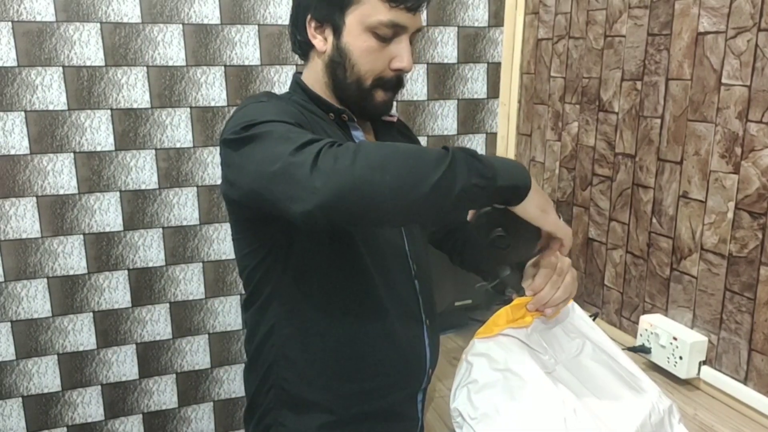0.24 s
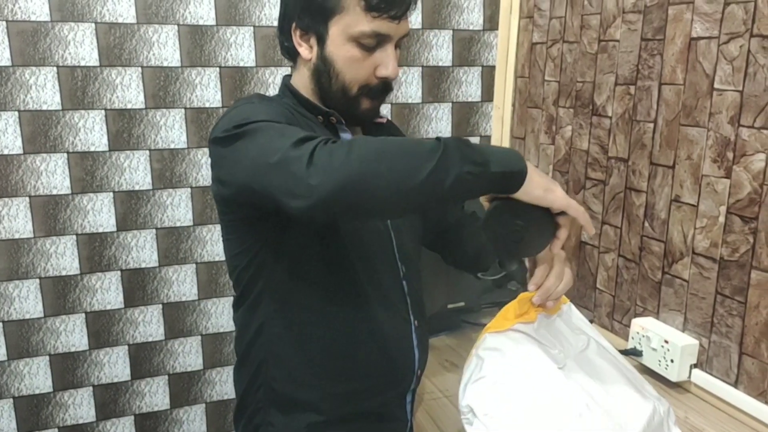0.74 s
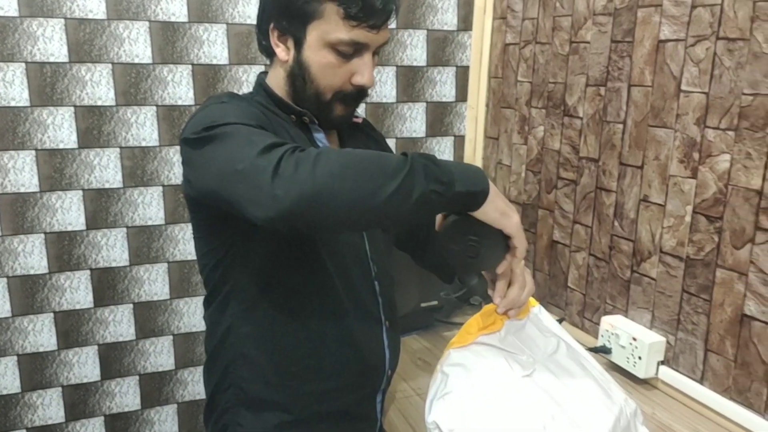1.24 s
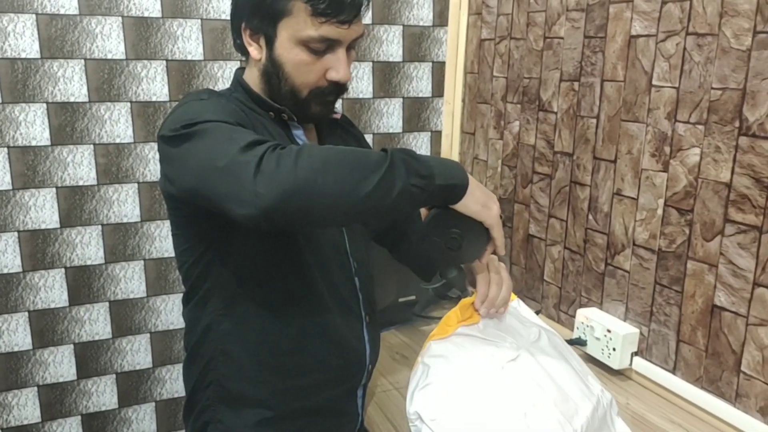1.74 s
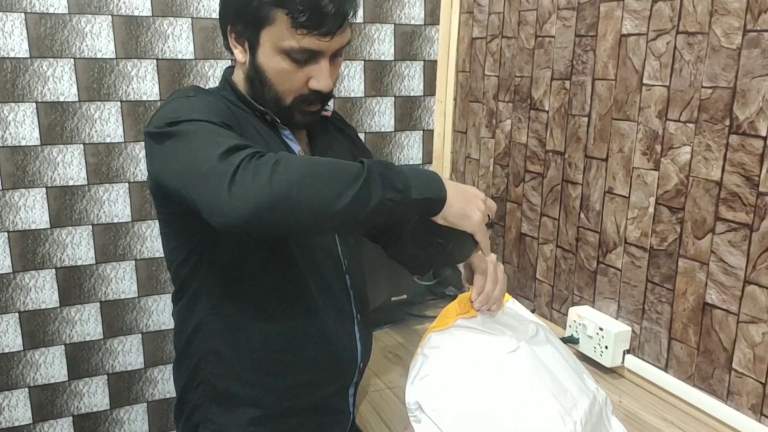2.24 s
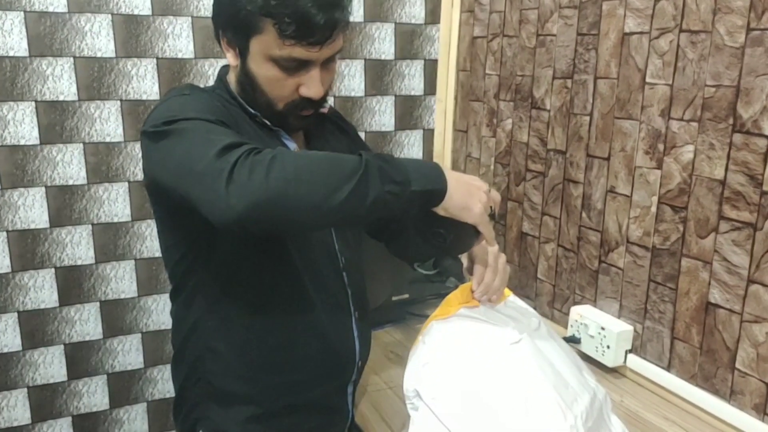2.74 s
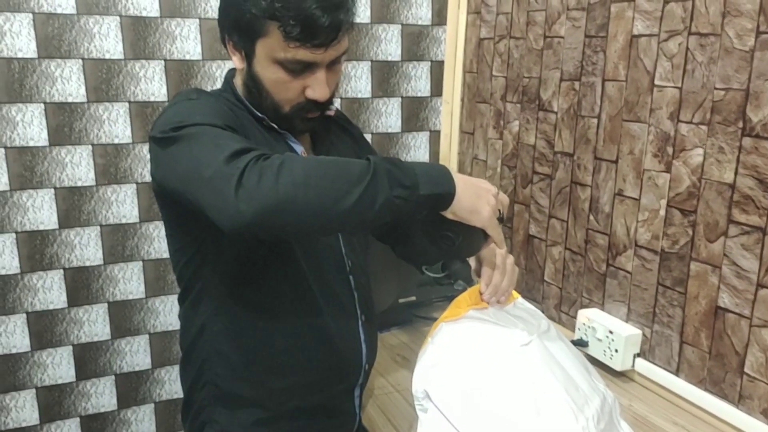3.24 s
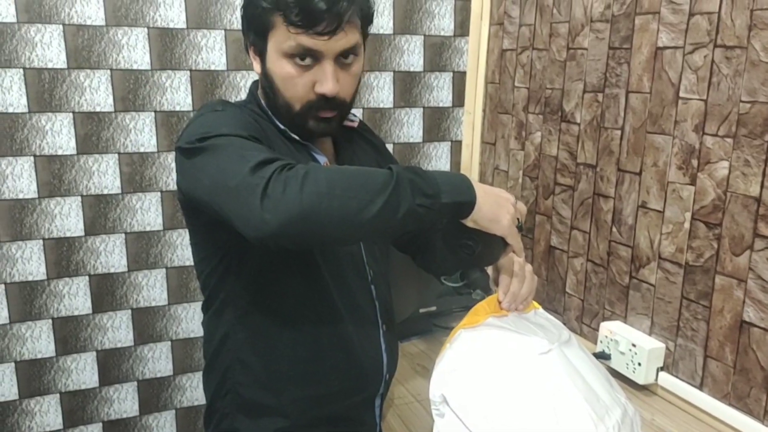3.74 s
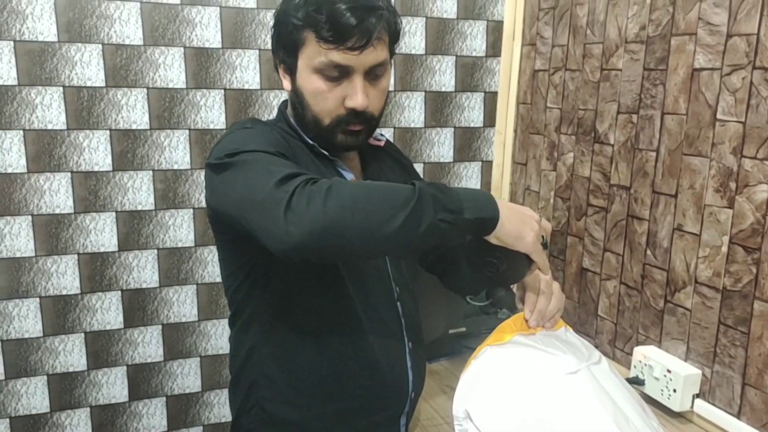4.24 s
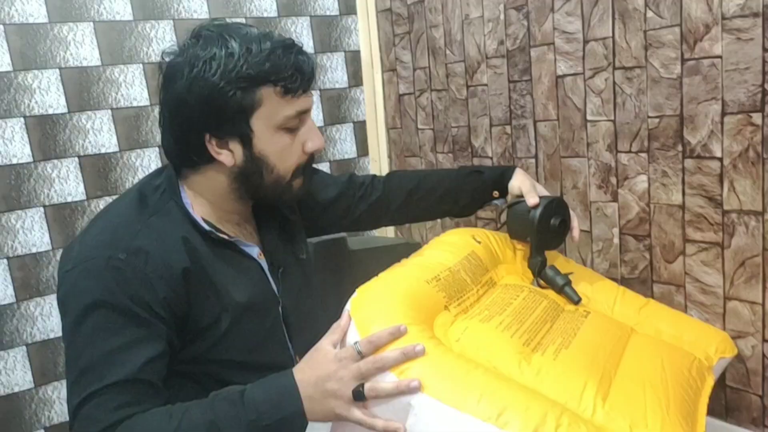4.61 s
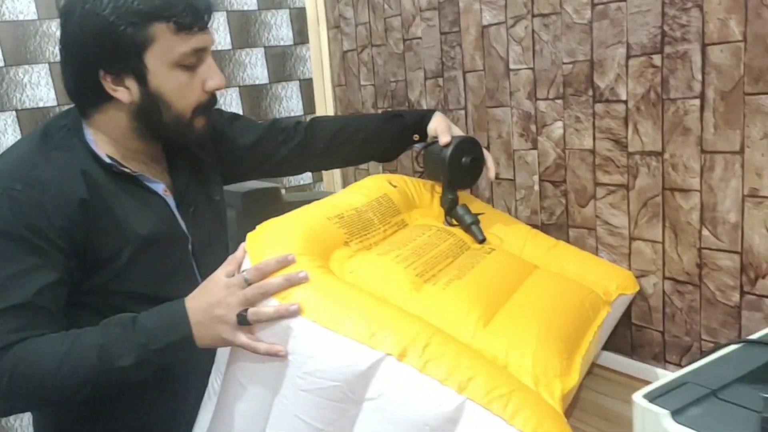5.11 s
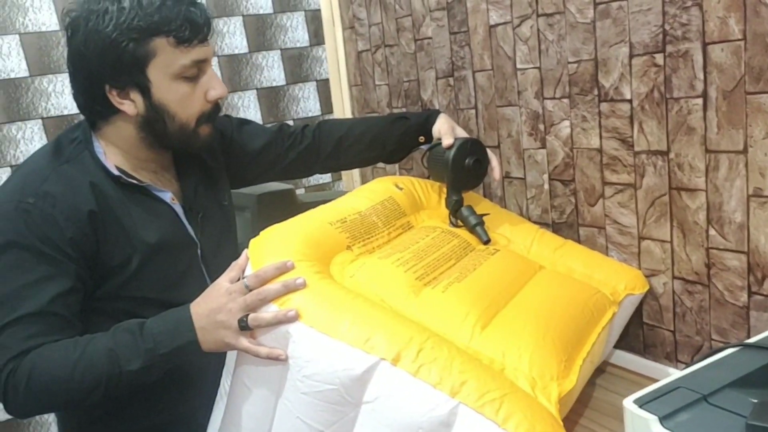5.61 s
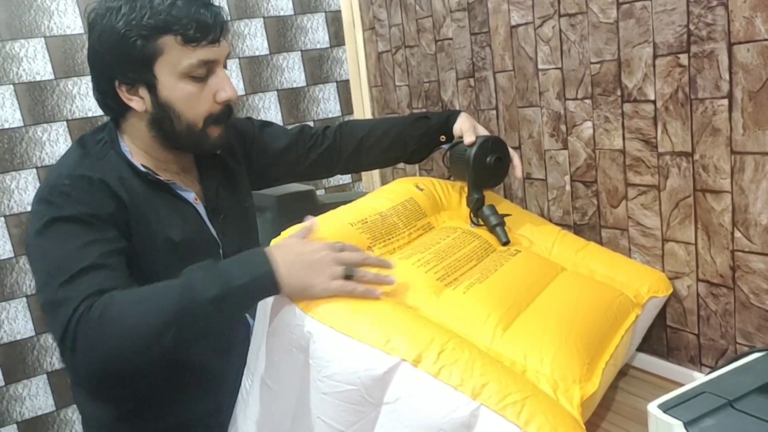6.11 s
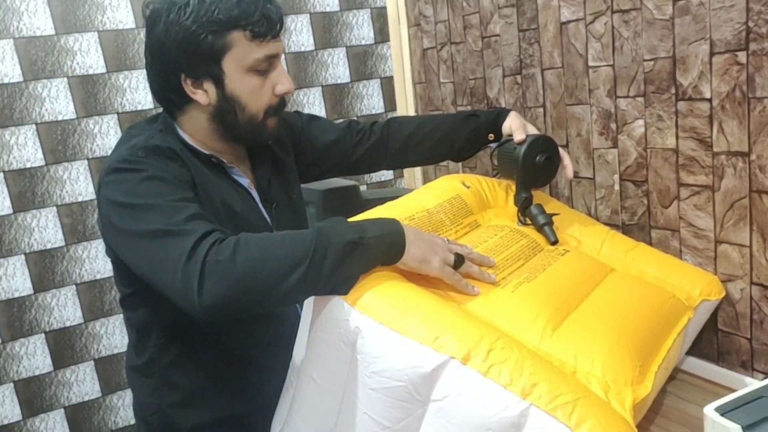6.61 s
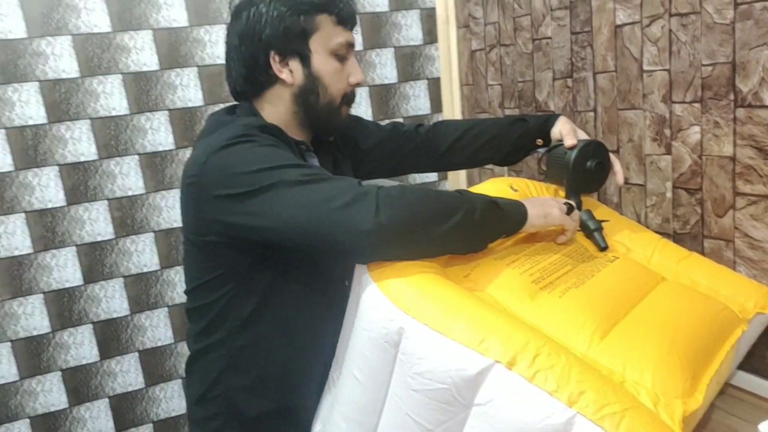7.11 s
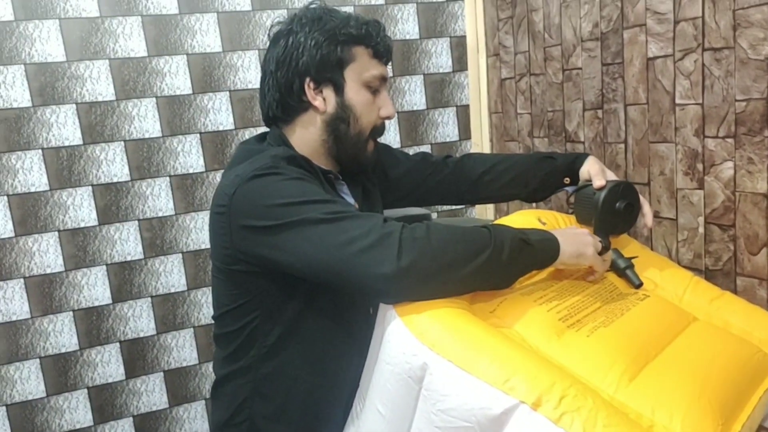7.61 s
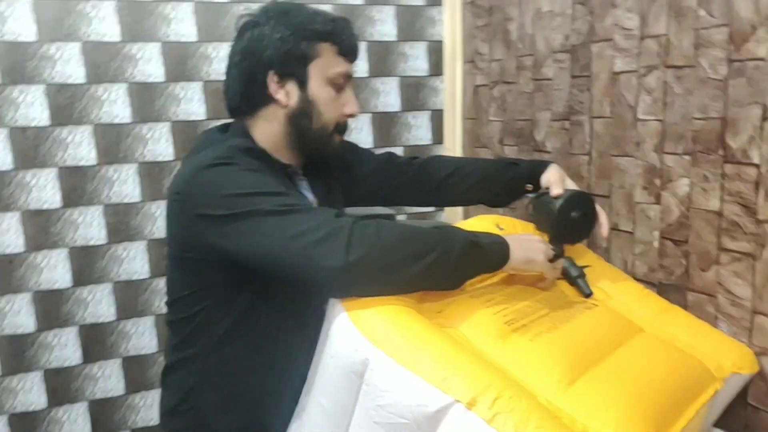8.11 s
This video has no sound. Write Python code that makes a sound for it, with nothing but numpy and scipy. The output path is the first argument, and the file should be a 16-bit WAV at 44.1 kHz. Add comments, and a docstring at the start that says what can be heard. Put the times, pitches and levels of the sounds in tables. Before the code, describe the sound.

Switch clicks, then a small electric air pump whines up, sags for half a second, revs again, cuts out, and resumes steadily before thinning to gurgle.

```python
"""Faint room noise and a few switch clicks come first, then a small electric air pump starts to whine.
It is blowing up a vinyl chair: it starts, coasts for half a second and revs up again, then a silent cut.
In the second part it runs steadily, until a noise suppressor leaves a gurgle and the whine.
Filtered noise makes the rush of air; sine tones tied to the turning shaft make the whine."""
import sys
import numpy as np
from scipy import signal
from scipy.fft import rfft, irfft, next_fast_len
from scipy.io import wavfile
from scipy.ndimage import uniform_filter1d, minimum_filter1d, map_coordinates

SR = 44100
rng = np.random.default_rng(int(sys.argv[2]) if len(sys.argv) > 2 else 0)


def dump_mix(stems):
    """Bounce the given channels to the path in sys.argv[1] as a 16-bit WAV at rate SR."""
    frames = np.atleast_2d(stems).T  # one column per channel
    limited = np.clip(frames, -1, 1)  # hard clip at full scale
    pcm = np.round(limited * 32767).astype(np.int16)
    wavfile.write(sys.argv[1], SR, pcm)


N = 368676
TIME = np.arange(N) / SR

# background noise of the room: pitch_hz, relative_db (per Hz)
ROOM_COLOUR = [(24, -61.5), (40, -38), (67, -31), (111, -2), (177, -28.5), (514, 3.5), (728, -11),
               (8480, -22.5), (15000, -34)]
# low hum near 100 Hz: pitch_hz, relative_db (per Hz)
HUM_COLOUR = [(25, -31.5), (60, -19.5), (100, -7.5), (125, -6), (160, -15), (300, -35)]
# colour of a plastic click: pitch_hz, relative_db (per Hz)
CLICK_COLOUR = [(59, -50), (100, -27), (1160, -13), (1290, -19), (1530, -9), (1840, -19.5), (3390, -27),
                (4540, -32), (15000, -25)]
# switch being pressed, snapping shut and settling: start_s, level_db, decay_s
SWITCH_CLICKS = [(0.1, -44, 0.0069), (.121, -50, 0.0093), (.14, -36.5, 0.012), (.158, -41, .006),
                 (.177, -40, .004)]
# hiss of a palm on the vinyl, its peaks: centre_hz, width_hz, lift_db
SLIDE_PEAKS = [(8150, 250, 9), (8770, 380, 14)]
# the slope under those peaks: pitch_hz, relative_db (per Hz)
SLIDE_SLOPE = [(6000, -6), (8500, 0), (12000, -8)]
# the open nozzle's resonance, which the pinch damps: centre_hz, width_hz, lift_db
NOZZLE_PEAKS = [(4320, 640, 22)]
# air leaking past the fingers that pinch the valve: centre_hz, width_hz, lift_db
LEAK_PEAKS = [(3890, 520, 26.5), (6550, 650, 23.5), (9100, 250, 21), (9750, 600, 19)]
# the slope under nozzle and leak: pitch_hz, relative_db (per Hz)
LEAK_SLOPE = [(1500, -15), (3000, 2), (11000, 2.0), (15000, -5)]
# scraping and sparking of the motor brushes: pitch_hz, relative_db (per Hz)
SPARK_COLOUR = [(500, -14.5), (1000, 3.5), (1400, 9), (2100, -12.5), (4000, -14.5), (5800, -20.5),
                (6800, -10.5), (8500, -8), (12500, -6.5), (14000, -23)]
# ways the pump's plastic shell can ring: centre_hz, width_hz, response_db
SHELL_MODES = [(2450, 230, -36), (3300, 150, -44), (3720, 130, -36), (3920, 190, -30.5)]
# motor tones that shake the shell at the start: multiple_of_shaft_rate, relative_db
START_ORDERS = [(10, 1.5), (16, -8), (19, -9), (24, -12)]

# jet of air as heard in each part: pitch_hz, relative_db (per Hz)
JET_FIRST = [(60.0, -63), (150.0, -31), (280.0, -14), (450.0, -8.5), (700.0, 0), (1100.0, -10.5),
             (1600.0, -12), (3000.0, -12.5), (5000.0, -20), (10000.0, -19.5), (15000.0, -25.5)]
JET_SECOND = [(60, -53), (150, -44.5), (280, -23), (450, -11), (700, 1.5), (1100, -14.5), (1600, -24.5),
              (3000, -30), (5000, -29.5), (10000, -29.5), (13000, -26.5), (15000, -29)]
# resonances of housing, nozzle and chair in each part: centre_hz, width_hz, lift_db
BODY_FIRST = [(307, 146, 4), (364, 30, 5), (494, 204, 12.5), (695, 190, 10), (784, 37, 7.5),
              (1006.6, 133, 14.5), (1253, 470, 8), (1770, 69, 7), (2160, 500, 5.5), (2550, 150, 6.5),
              (2760, 430, 5), (3770, 120, 7.5), (4176, 120, 7.5), (5410, 240, 4), (6650, 300, 5.5),
              (12200, 1400, 2)]
BODY_SECOND = [(99, 32, 8.5), (451, 27, 8), (686, 200, -1.5), (892, 85, 4.5), (1241, 215, 8.5),
               (1450, 110, 6), (2320, 440, 5), (2750, 240, 11), (3610, 160, 7.5), (4164, 660, 13),
               (5450, 230, 6), (6220, 97, 5), (6480, 200, 9), (6970, 1100, 5), (7560, 130, 4.5),
               (8450, 260, 6), (9150, 300, 2.5), (9950, 160, 6), (10200, 200, -1)]
# middle roar in the first part, before the effect of speed: time_s, level_db
ROAR_FIRST = [(.3, -31), (2.0, -31), (2.6, -33), (4.6, -33)]
# low rush in the second part, before the effect of speed: time_s, level_db
RUSH_SECOND = [(4.84, -23.7), (5.5, -23.5), (5.8, -24), (6.5, -24.5), (7.8, -23)]

# when the motor has power: on_s, off_s
POWER_FIRST = [(.14, .833), (1.358, 4.7)]
POWER_SECOND = [(0, 8.24)]
# full shaft speed in the second part, drifting with the load: time_s, turns_hz
FULL_SECOND = [(4.79, 456.1), (5.4, 459), (6.0, 457.9), (6.7, 457.2), (7.45, 456.8), (7.7, 455.4)]
# whine, swelling and fading as the pump turns in the hand; base level before speed, outlet and
# drop-outs: time_s, level_db
BLADE_FIRST = [(.25, -41.5), (.4, -42), (.5, -41), (.66, -38), (.8, -42), (.9, -36.5), (1.14, -35),
               (1.22, -38), (1.36, -35.5), (1.44, -38), (1.6, -40), (1.72, -37), (1.97, -42), (2.04, -33.5),
               (2.28, -34.5), (2.35, -41), (2.57, -36), (2.8, -53), (2.92, -40), (2.99, -52), (3.5, -55),
               (3.58, -41), (3.68, -39), (4.27, -44.5), (4.53, -35)]
BLADE_SECOND = [(4.8, -62), (5.68, -56), (5.79, -45), (5.95, -45), (6.07, -60), (6.27, -50), (6.4, -66),
                (6.78, -66), (6.92, -45.5), (7.2, -43), (7.52, -42.5), (7.62, -46.5), (7.75, -47),
                (7.95, -57), (8.21, -58), (8.27, -40.5), (8.36, -41)]
# the tone an octave above the whine, base level likewise: time_s, level_db
OCTAVE_FIRST = [(.35, -44), (.54, -47.5), (.63, -41), (.76, -51), (.92, -42), (1.15, -44), (1.35, -42.5),
                (1.55, -45.5), (1.75, -48), (1.93, -41), (2.2, -45)]
OCTAVE_SECOND = [(4.8, -56), (4.94, -43), (5.15, -56), (5.3, -57), (5.45, -51), (5.62, -53), (5.82, -45),
                 (5.95, -49), (6.13, -45.5), (6.3, -48), (6.52, -43.5), (6.8, -45), (7.05, -47.5),
                 (7.3, -47.5), (7.85, -48.5), (8.07, -45.5), (8.26, -47), (8.3, -46), (8.36, -47)]
# the whine or its octave drops out in a node of the room's standing waves: time_s
BLADE_DIPS = [.615, .845, 1.92, 2.09, 2.47, 3.77, 3.98]
OCTAVE_DIPS = [.56, 1.1, 1.79, 5.72, 6.42, 6.96, 7.39, 7.57]
# weaker tones of the uneven impeller: multiple_of_shaft_rate, relative_db
ORDERS_FIRST = [(1, -15), (2, -12), (8, -23.5), (9, -23.5), (13, -28.5), (14, -33), (18, -36.5), (19, -36),
                (22, -40.5), (23, -36), (26, -32.5), (30, -35)]
ORDERS_SECOND = [(6, -18), (8, -25), (14, -25), (19, -20), (20, -20), (22, -22), (24, -21), (26, -25),
                 (28, -19), (29, -20), (30, -21)]
# peaks and notches of the outlet that the whine sweeps through: centre_hz, width_hz, lift_db
OUTLET = [(5520, 180, 6), (5900, 200, -3), (6770, 140, 5), (11000, 410, 3), (12200, 400, 3),
          (13950, 420, 6), (15150, 290, 4.5), (15750, 250, -11.5)]

# how far the suppressor turns steady noise down: pitch_hz, change_db
SUPPRESS_DEPTH = [(100, -35), (170, -14), (250, -15), (450, -11), (750, -15.5), (1350, -12), (2200, -12),
                  (4800, -15), (8500, -9), (13000, -14), (15000, -10)]
# the clearest swells of the suppressed rush: time_s, centre_hz, lift_db
SWELLS = [(5.62, 334, 25.5), (5.99, 1460, 12), (6.24, 1270, 13.5), (6.344, 446, 15.5), (6.98, 1330, 11),
          (7.08, 644, 6.5), (7.142, 1420, 14), (7.23, 434, 12), (7.77, 480, 7.5), (7.89, 653, 12),
          (8.114, 420, 15.5), (8.16, 584, 7.5), (8.24, 743, 9)]

CUT_OUT_S, CUT_IN_S, SUPPRESS_FROM_S = 4.605, 4.78, 5.5
MOTOR_ON_S = 0.15  # the sounds of the motor and air build up from here
FULL_FIRST_HZ = 491.3  # turns per second
# a jerk to KICK_HZ at power-on, then a pull towards full speed against friction and air drag
KICK_HZ, PULL_S, FRICTION_PER_S, DRAG_PER_TURN = 80, .376, .466, .00134
# how much louder each sound gets per doubling of the shaft speed
RUSH_DB_PER_OCT, ROAR_DB_PER_OCT, HISS_DB_PER_OCT = 3.5, 7, 10
BLADE_DB_PER_OCT, OCTAVE_DB_PER_OCT = 14, 10
SLOW_BUILD_S, QUICK_BUILD_S = 0.088, 0.025  # how quickly the sounds get going


def undb(db):
    """Turns decibels into a gain."""
    return 10 ** (np.asarray(db) / 20)


def curves(table):
    """Joins the points of each table column by straight lines in time."""
    s, *columns = np.transpose(table)
    return [np.interp(TIME, s, column) for column in columns]


def ramp(start_s, length_s):
    """Rises in a straight line from 0 to 1."""
    return np.clip((TIME - start_s) / length_s, 0, 1)


def build_up(seconds):
    """Rises from 0 towards 1, slowly at first, from MOTOR_ON_S."""
    since_on = np.maximum(TIME - MOTOR_ON_S, 0)
    return 1 - np.exp(-(since_on / seconds) ** 1.5)


def walk(rate):
    """Wanders at random: levels held for 1 / rate s, smoothed twice, with a spread near 1."""
    hold = int(SR / rate)
    steps = np.repeat(rng.standard_normal(N // hold + 1), hold)
    smooth = uniform_filter1d(uniform_filter1d(steps, hold), hold)
    return 1.3 * smooth[:N]


def lift_db(hz, resonances):
    """What a set of resonances adds at a frequency."""
    return sum(db / (1 + (2 * (hz - centre) / width) ** 2) for centre, width, db in resonances)


def noise(slope, resonances=(), band=(20, SR / 2), ripple_db=0):
    """Noise of rms 1 in a band, with resonance peaks; nearby walls comb it with a fine fixed ripple."""
    size = next_fast_len(N, True)
    f = np.arange(size // 2 + 1) * SR / size + 1
    hz, db = np.transpose(slope)
    colour_db = np.interp(np.log(f), np.log(hz), db) + lift_db(f, resonances)
    ripple = np.interp(f, np.linspace(0, SR / 2, 320), rng.standard_normal(320))
    ripple = ripple * np.minimum(f / 6000, 1) ** 2  # weak in the bass
    in_band = (f >= band[0]) & (f < band[1])
    spectrum = rfft(rng.standard_normal(size)) * undb(colour_db + ripple_db * ripple) * in_band
    y = irfft(spectrum, size)[:N]
    return y / np.std(y)


def walls(x, wet_db, decay_s):
    """Adds the dense, fading echoes of a small room; a gliding tone beats against them."""
    age = np.arange(SR // 5) / SR
    echoes = rng.standard_normal(len(age)) * np.exp(-age / decay_s) * (age > .004)
    echoes = echoes / np.linalg.norm(echoes)
    return x + undb(wet_db) * signal.fftconvolve(x, echoes)[:N]


def room_noise():
    """The quiet, mostly low background of the room: coloured noise."""
    return undb(-74) * noise(ROOM_COLOUR)


def low_hum(gain):
    """A low hum near 100 Hz, made of coloured noise."""
    return gain * noise(HUM_COLOUR)


def clicks():
    """The switch parts strike each other: short bursts of noise that die away at once."""
    strikes = sum(undb(db) * (TIME >= s) * np.exp(-np.abs(TIME - s) / decay)
                  for s, db, decay in SWITCH_CLICKS)
    return strikes * noise(CLICK_COLOUR)


def hand_slide():
    """A palm slides over the taut vinyl towards the valve with a faint, uneven hiss."""
    contact = ramp(6.52, .04) * (1 - ramp(6.85, 0.16))
    hiss = noise(SLIDE_SLOPE, SLIDE_PEAKS, band=(6000, 12000))
    return contact * undb(-47.5 + 1.5 * walk(25)) * hiss


def valve_leak():
    """The open nozzle hisses on one resonance; as fingers pinch the valve, a broader leak takes over."""
    grip = ramp(6.73, 0.57)
    nozzle = undb(-45.5 - 24 * grip) * noise(LEAK_SLOPE, NOZZLE_PEAKS, band=(3000, 5200))
    leak = grip * undb(-43.5 + .5 * walk(12)) * noise(LEAK_SLOPE, LEAK_PEAKS)
    return nozzle + leak


def brushes(angle):
    """Brushes scrape and spark under the inrush current, twice a turn, then settle."""
    inrush = ramp(MOTOR_ON_S, 0.018) * np.exp(-np.abs(TIME - MOTOR_ON_S) / 0.24)
    bursts = 1 + 0.36 * np.sin(2 * angle)
    return undb(-35 + 2 * walk(90)) * inrush * bursts * noise(SPARK_COLOUR)


def shell_ring(shaft_hz, angle, order):
    """A motor tone sings out whenever it sweeps through a mode of the plastic shell."""
    response = sum(undb(db) / (1 + (2 * (order * shaft_hz - hz) / width) ** 2)
                   for hz, width, db in SHELL_MODES)
    return response * np.sin(order * angle)


def starting_buzz(shaft_hz, angle, buzz_db, fade_s):
    """Starting torque makes the motor buzz and shake its shell; each buzzing overtone flickers."""
    torque = np.clip((1 - TIME) / .5, 0, 1)
    ring = sum(undb(db) * shell_ring(shaft_hz, angle, order=round(k)) for k, db in START_ORDERS)
    buzz = sum(undb(5 * walk(70)) * np.sin(k * angle) for k in (10, 14, 16, 19))
    fade = np.exp(-np.abs(TIME - MOTOR_ON_S) / fade_s)
    return torque * ring + undb(buzz_db) * fade * buzz


def airflow(octaves, rush_db, roar_db, hiss_db, jet, body, flutter_db, flicker_db):
    """Turbulent air rings the housing; rush, roar and hiss grow with speed and flutter together."""
    def layer(db, band):
        # each layer also flickers a little on its own
        return undb(db + flicker_db * walk(50)) * noise(jet, body, band, ripple_db=2.4)

    rush = layer(rush_db + RUSH_DB_PER_OCT * octaves, (100, 1300))
    roar = layer(roar_db + ROAR_DB_PER_OCT * octaves, (1300, 3300))
    hiss = layer(hiss_db + HISS_DB_PER_OCT * octaves, (3300, SR / 2))
    # the air takes a moment to get moving
    air = build_up(SLOW_BUILD_S) * rush + build_up(QUICK_BUILD_S) * (roar + hiss)
    return undb(flutter_db * walk(140)) * air


def shaft_speed(power, full_hz, load):
    """Power pulls the shaft to full speed; without it, friction and air drag slow it, more under load."""
    hop = 44  # samples per step
    step_s = hop / SR

    def loss(hz):
        return load * (FRICTION_PER_S * hz + DRAG_PER_TURN * hz ** 2)

    hz, speeds = 1., []
    for s, full in zip(TIME[::hop].tolist(), (full_hz * np.ones(N))[::hop].tolist()):
        if any(on <= s < off for on, off in power):
            hz = max(hz, KICK_HZ) + ((full - hz) / PULL_S + loss(full)) * step_s
        hz -= loss(hz) * step_s
        speeds.append(hz)
    return np.interp(TIME, TIME[::hop], speeds)


def dips_db(times):
    """Brief drop-outs of a tone, 8 dB deep and about 38 ms wide."""
    return sum(-8 / (1 + (2 * (TIME - s) / 0.038) ** 4) for s in times)


def impeller(shaft_hz, octaves, blade_db, octave_db, orders, orders_db, jitter, waver_db, stray_db, smear):
    """Sixteen pulses a turn make the whine and its octave; unequal blades add other multiples."""
    angle = 2 * np.pi * np.cumsum(shaft_hz * (1 + jitter * walk(60))) / SR

    def partial(order, db):
        return undb(db + lift_db(order * shaft_hz, OUTLET)) * np.sin(order * angle)

    whine = partial(16, blade_db + BLADE_DB_PER_OCT * octaves + dips_db(BLADE_DIPS))
    octave = partial(32, octave_db + OCTAVE_DB_PER_OCT * octaves + dips_db(OCTAVE_DIPS))
    tone = (whine + octave) * undb(waver_db * walk(24.93))
    for k, db in orders:
        # the small shell cannot radiate low tones
        radiated = 1 / (1 + (400 / (k * shaft_hz)) ** 8)
        # the hand-held pump moves through the room's standing waves, so each tone swells and fades
        level = undb(orders_db + db + HISS_DB_PER_OCT * octaves + stray_db * walk(5.4))
        # turbulence smears the phase
        tone = tone + radiated * level * np.sin(round(k) * angle + smear * walk(150))
    return np.sqrt(2) * tone, angle


def first_part():
    """The pump starts as the switch clicks, coasts for half a second and runs up again."""
    shaft_hz = shaft_speed(POWER_FIRST, FULL_FIRST_HZ, load=1)
    octaves = np.log2(shaft_hz / FULL_FIRST_HZ)
    air = airflow(octaves, rush_db=-23, roar_db=curves(ROAR_FIRST)[0], hiss_db=-33.5,
                  jet=JET_FIRST, body=BODY_FIRST, flutter_db=0.44, flicker_db=.5)
    whine, angle = impeller(
        shaft_hz, octaves, blade_db=curves(BLADE_FIRST)[0], octave_db=curves(OCTAVE_FIRST)[0],
        orders=ORDERS_FIRST, orders_db=-29.0, jitter=0.00052,
        waver_db=1.2 + 3 * np.minimum(-octaves, .7), stray_db=2.5, smear=0.52)
    buzz = starting_buzz(shaft_hz, angle, buzz_db=-55, fade_s=.2)
    motor = walls(whine + buzz, wet_db=-12, decay_s=0.03)
    # near 1 while the shaft turns slower than about 333 Hz; the hum is louder then
    slow = 1 / (1 + (shaft_hz / 333) ** 12)
    hum = low_hum(undb(-88.0) + undb(-60) * slow)
    motor = build_up(QUICK_BUILD_S) * motor
    hum = build_up(SLOW_BUILD_S) * hum
    return air + brushes(angle) + motor + hum + room_noise()


def second_part():
    """The pump runs at a steady, lower speed under more load and begins to coast at the very end."""
    full_hz, = curves(FULL_SECOND)
    shaft_hz = shaft_speed(POWER_SECOND, full_hz, load=1.7)
    octaves = np.log2(shaft_hz / full_hz)
    air = airflow(octaves, rush_db=curves(RUSH_SECOND)[0], roar_db=-36.5, hiss_db=-37.5,
                  jet=JET_SECOND, body=BODY_SECOND, flutter_db=0.91, flicker_db=.5)
    whine, _ = impeller(
        shaft_hz, octaves, blade_db=curves(BLADE_SECOND)[0], octave_db=curves(OCTAVE_SECOND)[0],
        orders=ORDERS_SECOND, orders_db=-39.5, jitter=0.0006,
        waver_db=1.2 - 9 * octaves, stray_db=3.2, smear=0.8)
    motor = walls(whine, wet_db=-11, decay_s=0.049)
    hum = low_hum(undb(-65.5))
    # a short quieter moment at the beginning
    opening = undb(-6 * (1 - ramp(CUT_IN_S + 0.055, 0.003)))
    return opening * (air + motor + valve_leak() + hand_slide() + hum)


def scene():
    """Two parts with silence between them, alike in both ears."""
    first = (first_part() + clicks()) * (TIME < CUT_OUT_S)
    second = second_part() * ramp(CUT_IN_S, 0.0049)
    mono = first + second
    return np.array([mono, mono])


def warble(hz, s, rate, patch_width, corner_hz):
    """A random level for each band and moment, spread near 1; patches widen towards the treble."""
    grid = rng.standard_normal((128, 256))
    place = np.meshgrid(np.log1p(hz / corner_hz) / patch_width, s * rate, indexing="ij")
    return map_coordinates(grid, place, order=3, mode="wrap")


def gurgle_db(hz, s, quick_db, slow_db, well_db):
    """The remaining rush gurgles in quick and slow patches; from 300 to 1600 Hz some well up."""
    # the lowest tones stay steadier, the highest a little
    strength = np.interp(hz, [100, 300, 4500, 8000], [.2, 1, 1.1, .85])[:, None]
    quick = warble(hz, s, rate=24, patch_width=.03, corner_hz=2600) * strength
    slow = warble(hz, s, rate=4, patch_width=.004, corner_hz=20000)
    patches = warble(hz, s, rate=11, patch_width=.035, corner_hz=2600)
    welling = np.maximum(patches - 1, 0) * ((hz > 300) & (hz < 1600))[:, None]
    swells = 0
    for at, centre, lift in SWELLS:
        in_pitch = np.exp(-2 * ((hz - centre) / 97) ** 2)  # width in Hz
        in_time = np.exp(-2 * ((s - at) / 0.084) ** 2)  # width in seconds
        swells = swells + lift * np.outer(in_pitch, in_time)
    return quick_db * quick + slow_db * slow + well_db * welling + swells


def suppress(x, threshold_db, knee, settle_s, size=1024):
    """Learns the steady rush of the second part, then turns down bands that do not stand out from it."""
    overlap = size * 3 // 4
    hz, s, bins = signal.stft(x, SR, nperseg=size, noverlap=overlap)
    power = np.abs(bins) ** 2 + 1e-20
    learnt = power[:, (s > CUT_IN_S) & (s < SUPPRESS_FROM_S)].mean(axis=1)
    # narrow lines are not counted as noise
    learnt = np.minimum(learnt, 2 * uniform_filter1d(minimum_filter1d(learnt, size=5), size=3))
    recent = uniform_filter1d(uniform_filter1d(power, size=9, axis=1), size=3, axis=0)
    ratio = np.maximum(recent, 0) / learnt[:, None] / undb(threshold_db) ** 2
    excess = ratio ** knee
    depth_db = np.interp(hz, *np.transpose(SUPPRESS_DEPTH))[:, None]
    floor = undb(depth_db + gurgle_db(hz, s, quick_db=3.3, slow_db=2.3, well_db=3.2))
    gain = floor + (1 - floor) * excess / (1 + excess)
    engaged = 1 - np.exp(-np.maximum(s - SUPPRESS_FROM_S, 0) / settle_s)
    return signal.istft(bins * gain ** engaged, SR, nperseg=size, noverlap=overlap)[1][:N]


def record(dry):
    """A mono phone microphone path with a noise suppressor and a steep cut above 15.5 kHz."""
    mono = suppress(dry.mean(axis=0), threshold_db=10.0, knee=2.5, settle_s=.03)
    top_cut = signal.ellip(10, .2, 90, 15500, fs=SR, output="sos")
    mono = signal.sosfilt(top_cut, mono)
    return np.array([mono, mono])


dry = scene()
out = record(dry)
dump_mix(out)
```